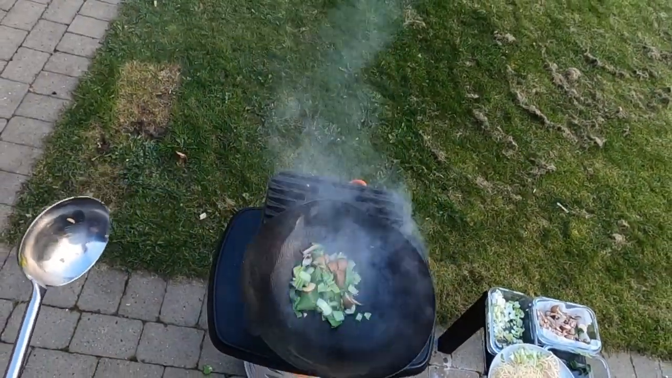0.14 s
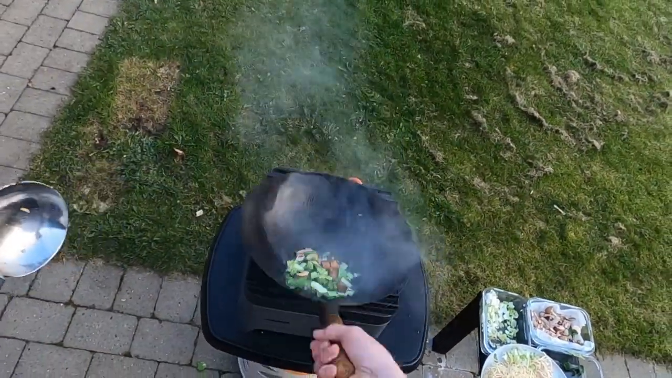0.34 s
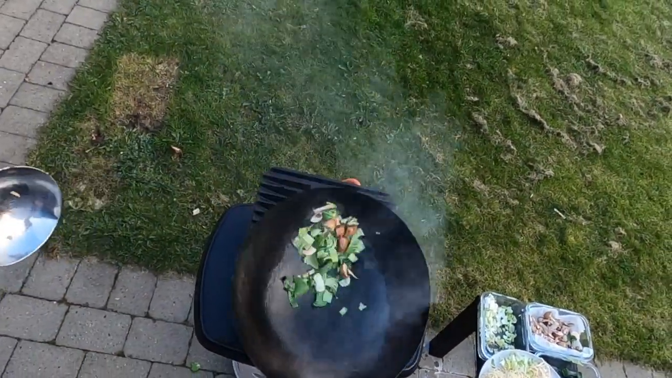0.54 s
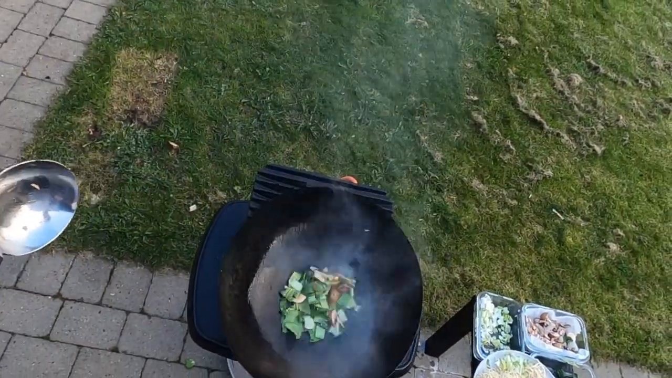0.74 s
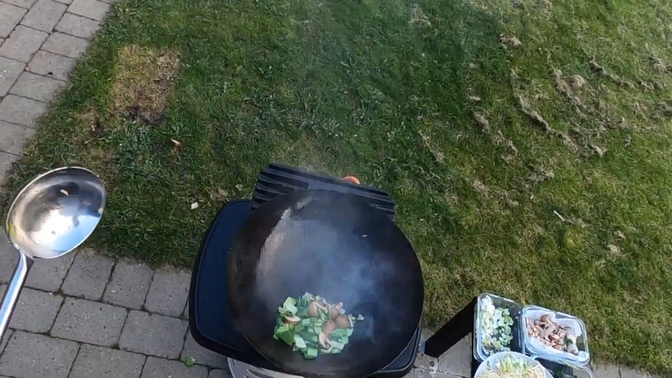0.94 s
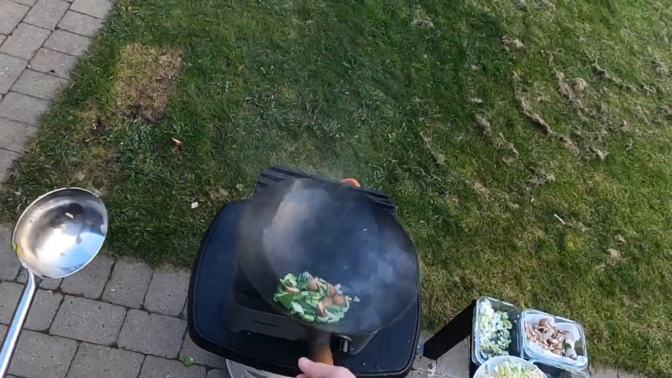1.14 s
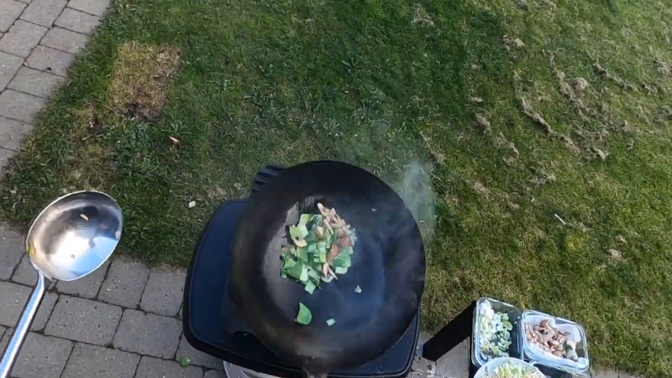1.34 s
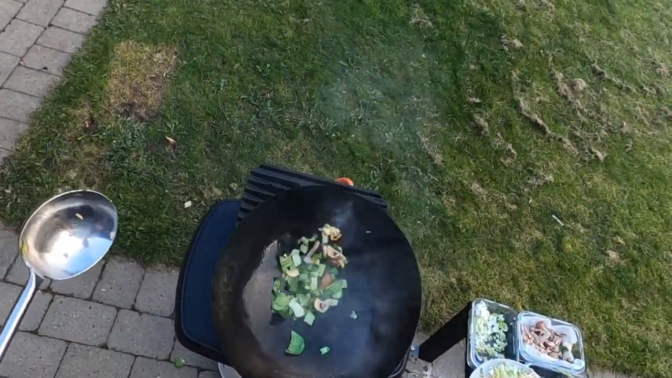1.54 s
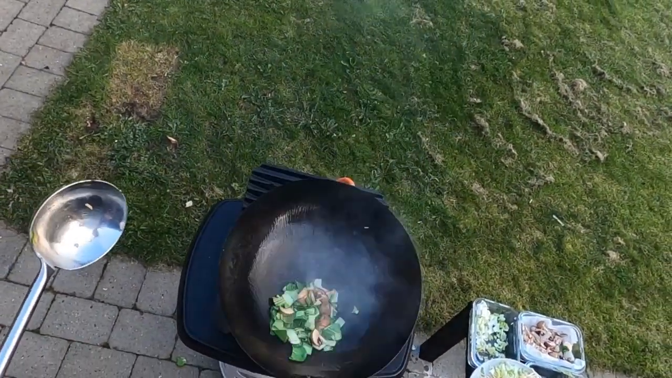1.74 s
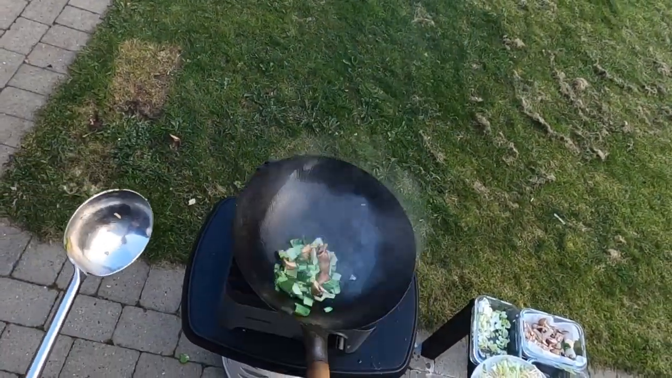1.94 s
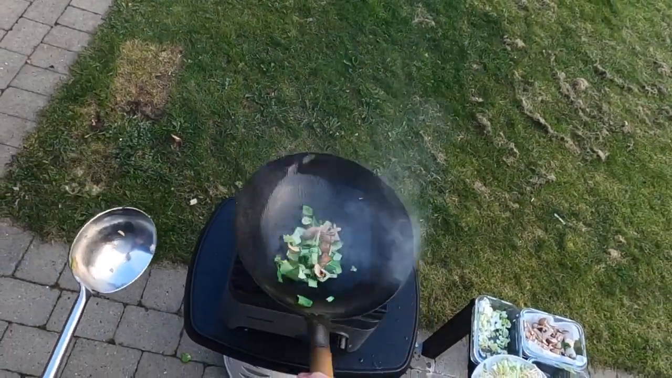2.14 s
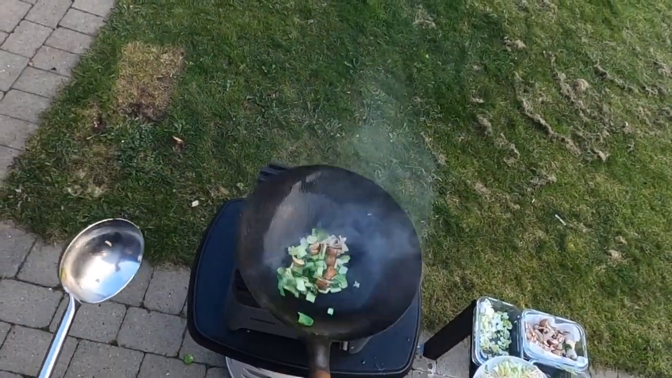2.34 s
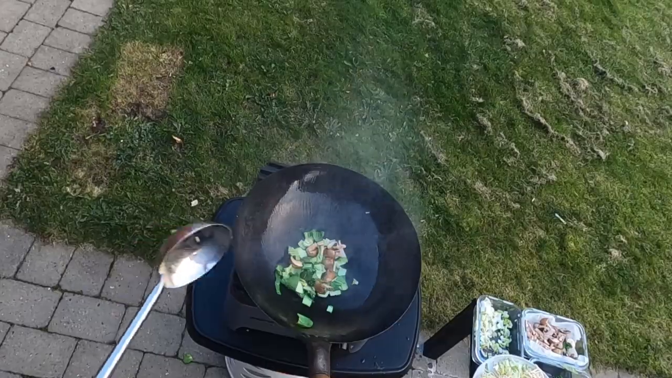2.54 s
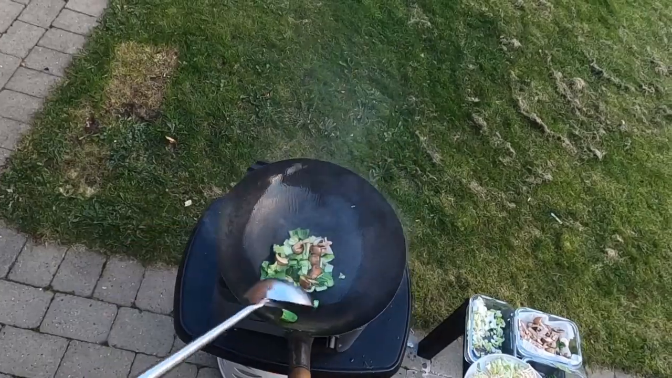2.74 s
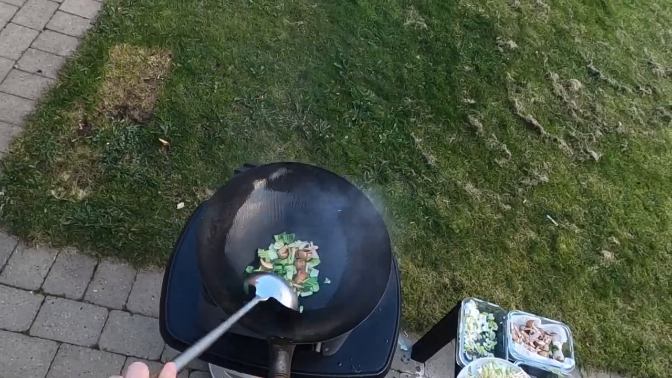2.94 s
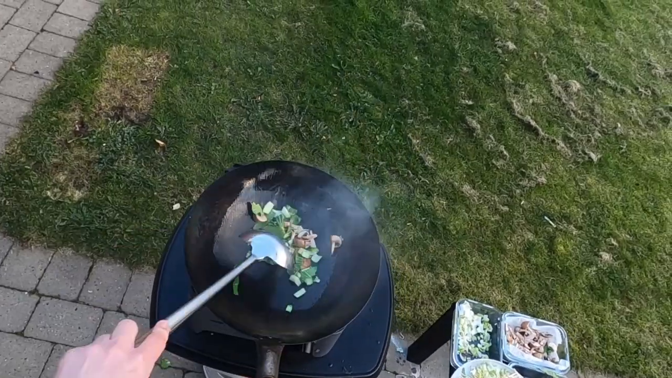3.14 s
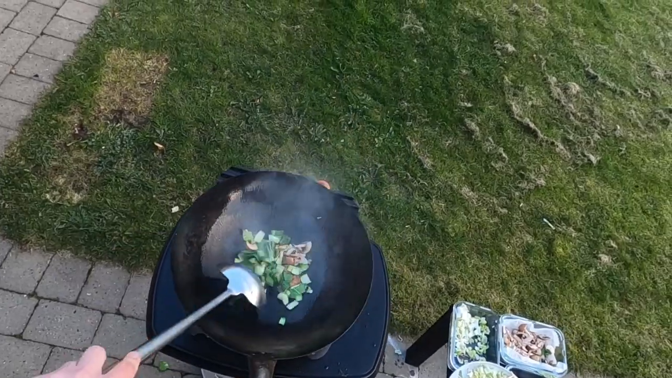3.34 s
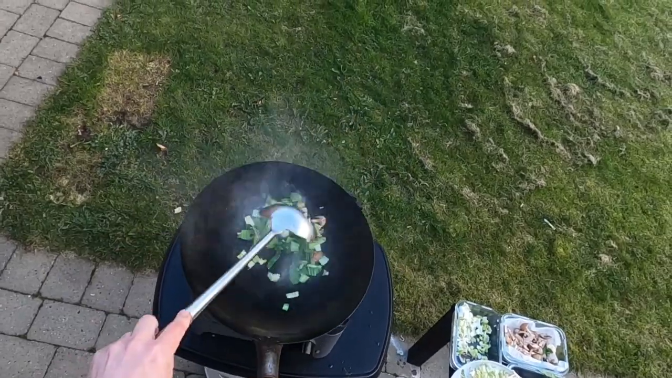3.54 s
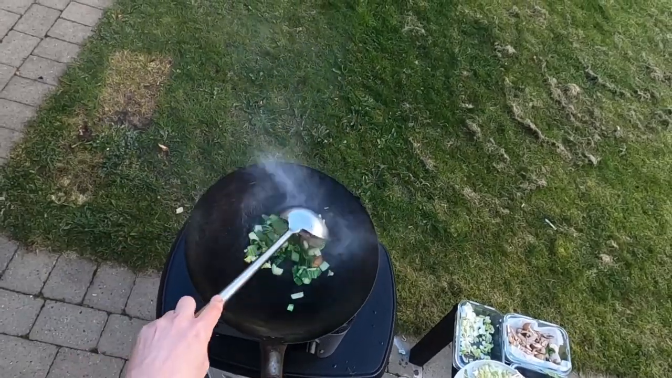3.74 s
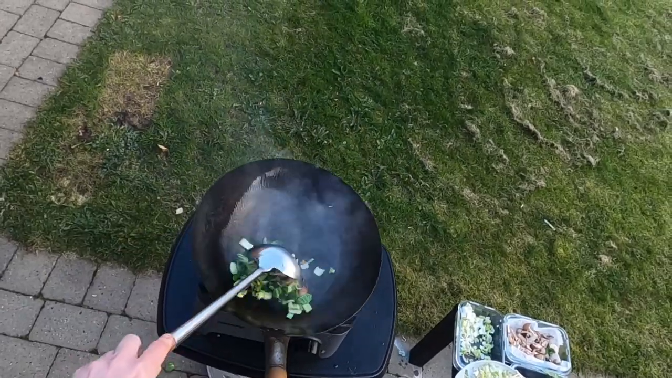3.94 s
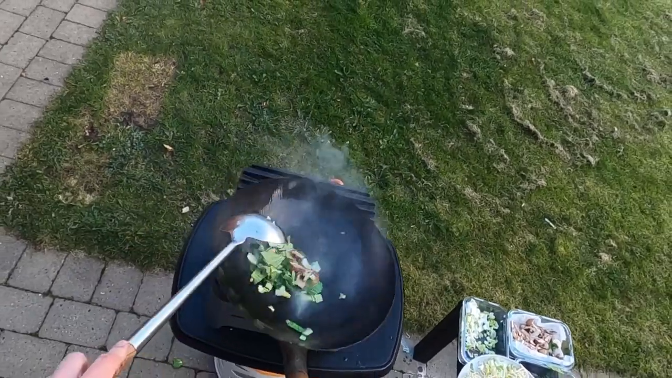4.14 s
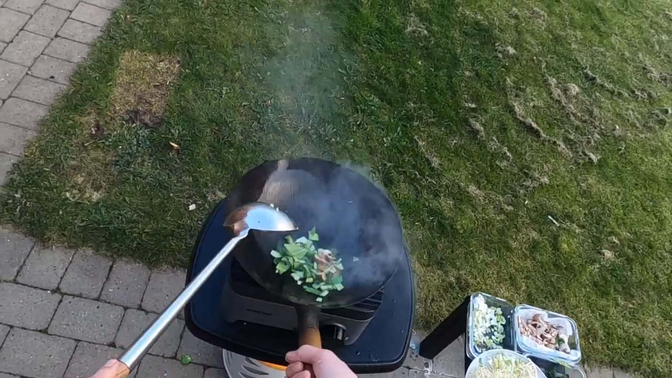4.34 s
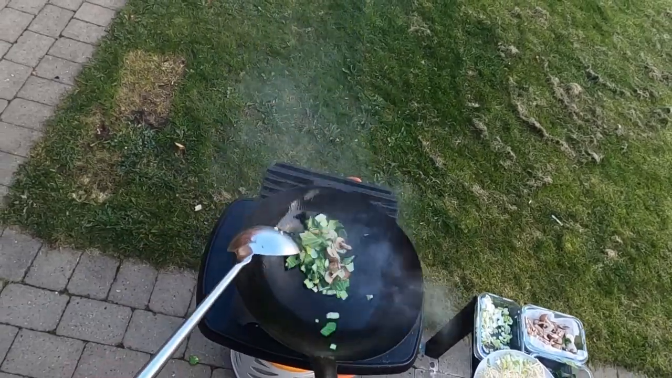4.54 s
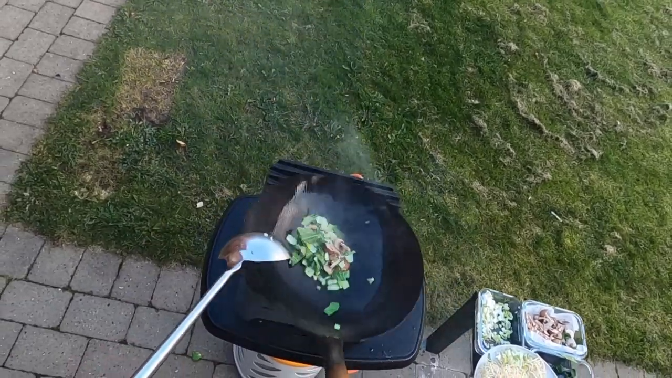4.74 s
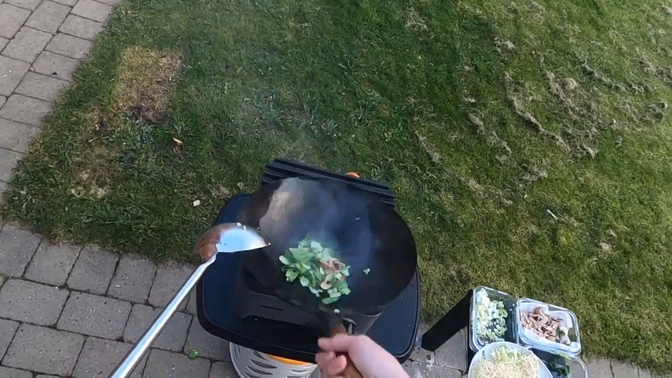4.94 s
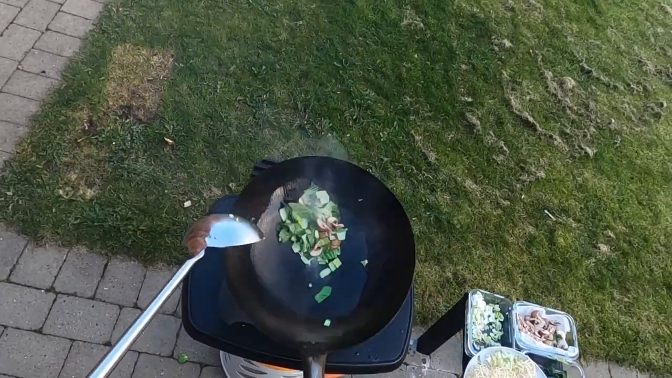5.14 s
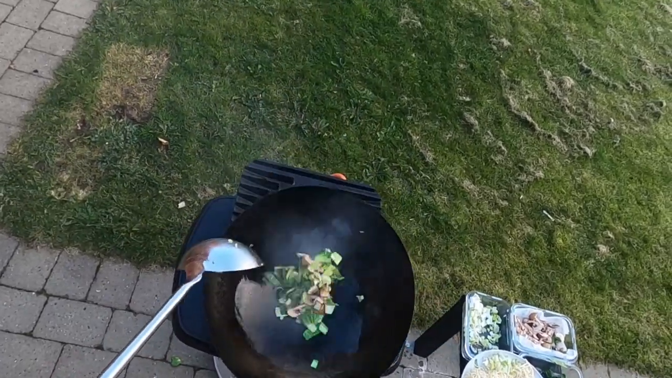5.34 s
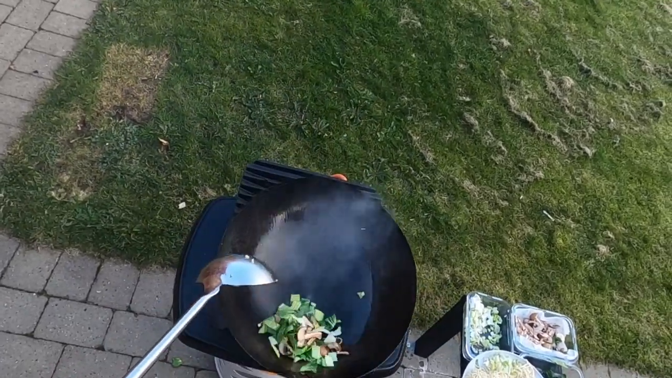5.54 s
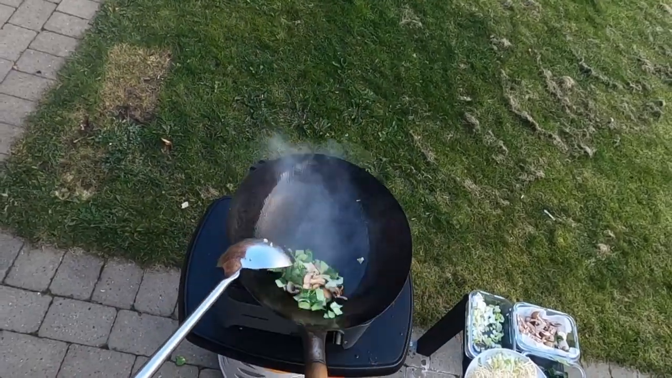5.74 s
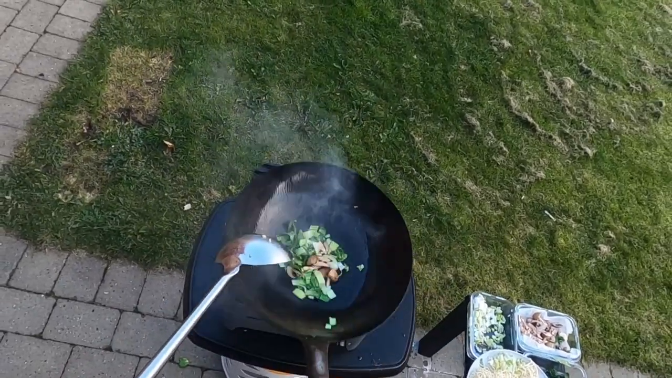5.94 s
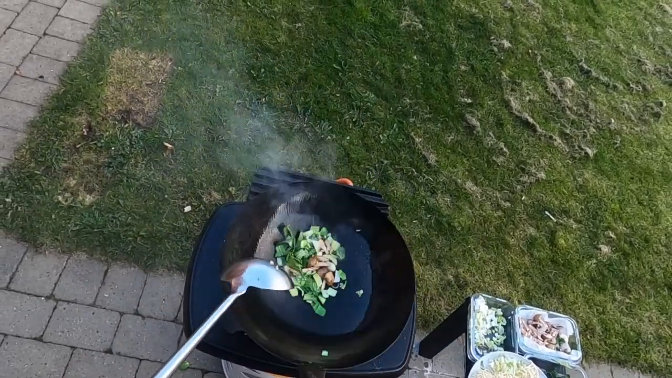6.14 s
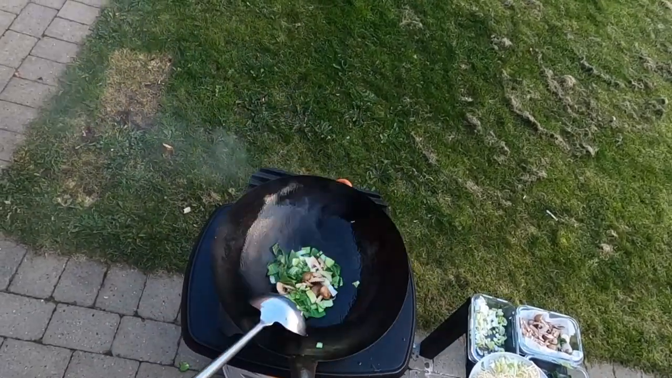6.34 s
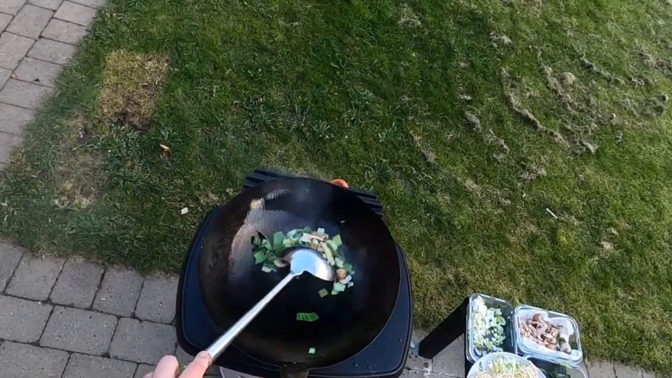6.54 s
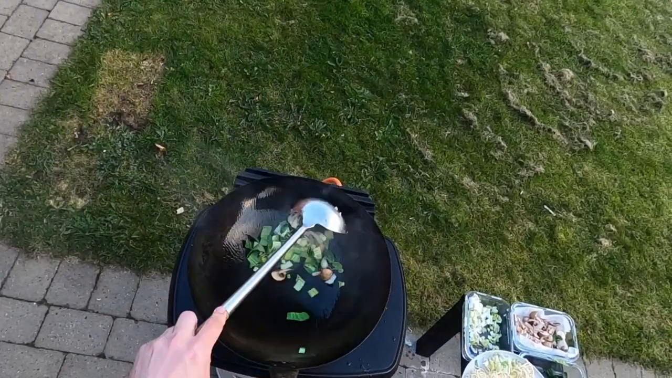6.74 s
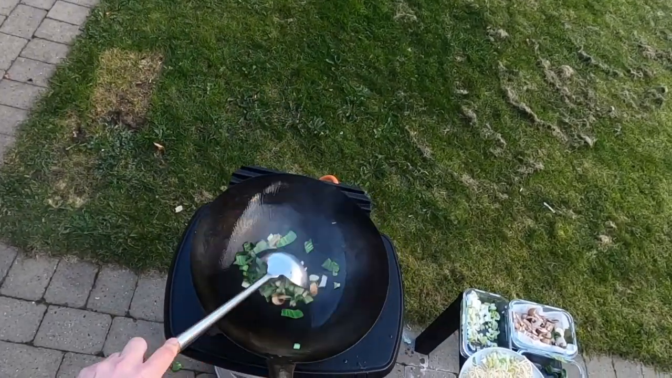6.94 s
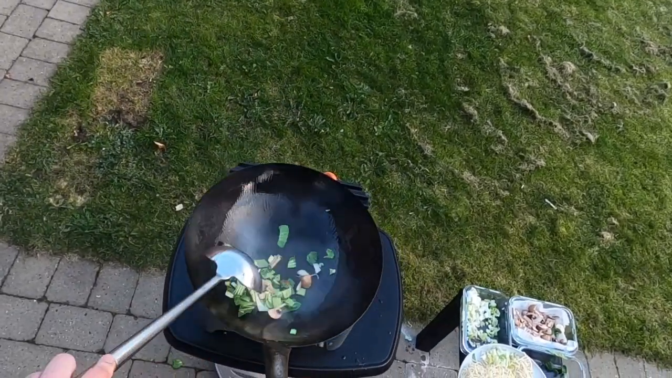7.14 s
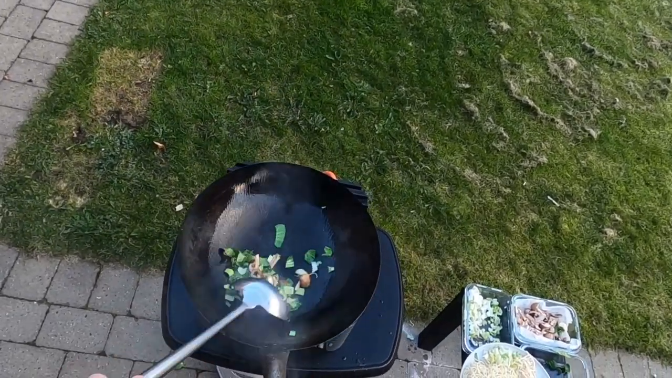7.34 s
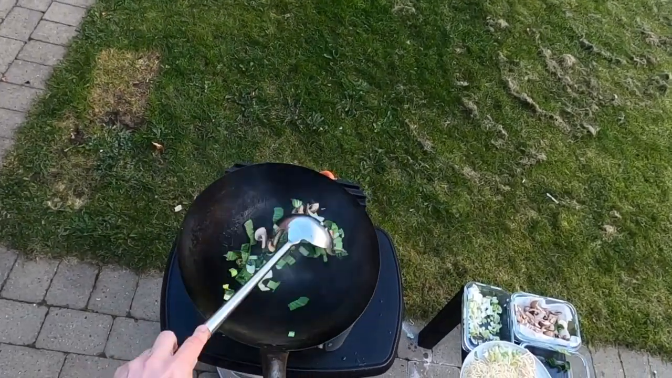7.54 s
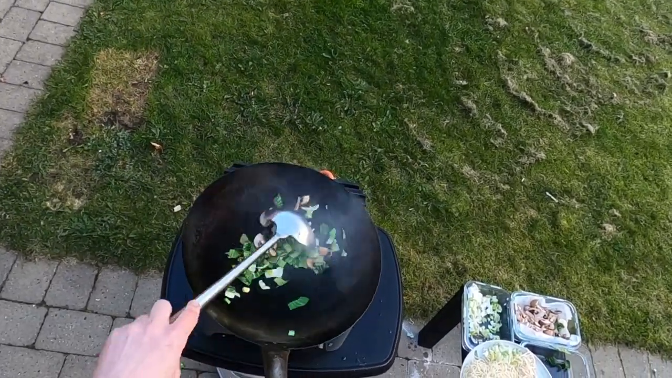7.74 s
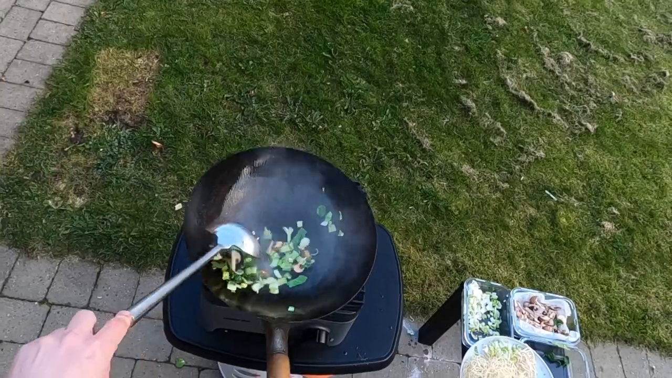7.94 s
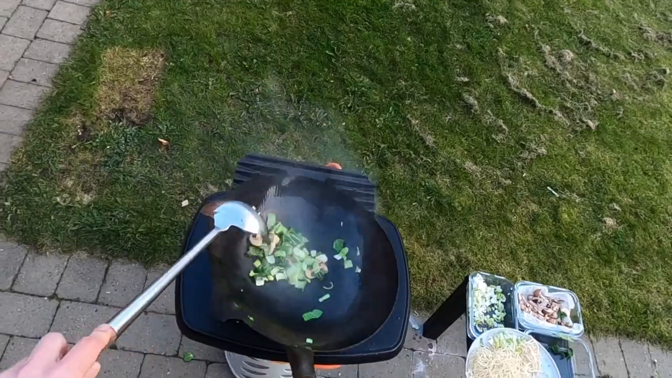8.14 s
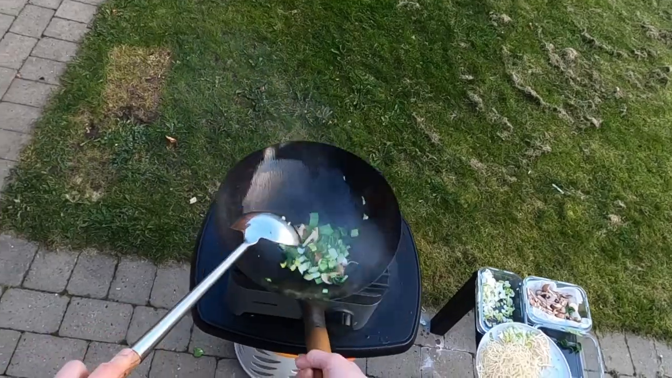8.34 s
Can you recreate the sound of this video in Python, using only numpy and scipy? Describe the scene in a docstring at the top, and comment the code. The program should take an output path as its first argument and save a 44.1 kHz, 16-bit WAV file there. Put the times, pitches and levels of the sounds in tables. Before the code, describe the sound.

Steady sizzling in a wok over a gas flame, broken by thumps as the pan is tossed, then ringing metal ladle strikes and scrapes.

```python
"""Food hisses and crackles in a steel wok over a gas flame, with spits of fat, thuds, scrapes and gusts of wind.
Frying is patchy noise and tiny bursts; a spit is a few dying sine tones. Low thuds (some perhaps buffets of wind)
and strikes of the ladle are short low swings followed by ringing steel; scrapes and skids are gritty noise through
the same resonances. Dragging and flame are low bumpy noise; wind is deep noise that differs between two ports."""
import sys
import numpy as np
from scipy import signal
from scipy.fft import rfft, irfft, next_fast_len
from scipy.io import wavfile
from scipy.ndimage import uniform_filter1d, map_coordinates

SR = 44100
rng = np.random.default_rng(int(sys.argv[2]) if len(sys.argv) > 2 else 0)


def materialize(psi):
    """Save the field psi as 16-bit PCM at rate SR to the path in sys.argv[1].

    A 1-D psi becomes a single channel; in a 2-D psi each row is a channel.
    """
    bounded = np.clip(np.atleast_2d(psi).T, -1, 1)
    quanta = np.round(bounded * 32767).astype(np.int16)
    wavfile.write(sys.argv[1], SR, quanta)


def gain_from_decibels(decibels):
    """Convert decibel values to linear amplitude factors."""
    exponent = np.asarray(decibels, float) / 20
    return 10 ** exponent


N = 369999  # length [samples]

# resonances of the wok bowl: (frequency [Hz], width [Hz], level [dB])
WOK_MODES = [(124.5, 10.3, 1), (248, 8.2, -12), (378, 37, 16.5), (540, 42, 4), (645, 22, 4),
             (716, 9.8, -3.5), (896, 103, 0), (1023, 32, -2), (1093, 51, 3), (1276, 33, -3),
             (1473, 55, -3.5), (1920, 49, 6), (2270, 92, 10), (2580, 83, 1)]
# resonances of the ladle: (frequency [Hz], width [Hz], level [dB])
LADLE_MODES = [(3636, 103, -2.5), (3858, 33, 4.5), (3980, 29, 0.5), (4130, 43, 0.5), (4334, 19, 0),
               (4360, 15, 0.5), (4556, 110, 1), (4870, 29, 3), (5060, 100, -8), (5560, 51, 0),
               (6200, 240, -11)]


def unit(x):
    """Scales to an average strength (rms) of 1."""
    return x / np.sqrt(np.mean(x ** 2) + 1e-20)


def along(points, hz):
    """Reads a curve of (frequency [Hz], value) points on a log frequency axis."""
    f, v = np.transpose(points)
    return np.interp(np.log(hz + 1), np.log(f + 1), v)


def curves(rows):
    """Draws straight lines through a table: one value per sample for each column after the time."""
    s, *columns = np.transpose(rows)
    return [np.interp(np.arange(N) / SR, s, column) for column in columns]


def wobble(rate):
    """A smooth random curve through `rate` random points a second."""
    points = rng.standard_normal(int(N * rate / SR) + 4)
    return map_coordinates(points, [np.arange(N) * rate / SR])


def filtered(x, response):
    """Multiplies the spectrum of x by a (possibly complex) response of frequency."""
    m = next_fast_len(N + SR // 2)
    return irfft(rfft(x, m) * response(np.fft.rfftfreq(m, 1 / SR)), m)[..., :N]


def modes(table):
    """The response of resonances that ring on after a push; neighbours have opposite signs."""
    def response(f):
        total = 0
        for k, (centre, width, db) in enumerate(table):
            total = total + (-1) ** k * gain_from_decibels(db) * 1j * f * width / (centre * centre - f * f + 1j * f * width)
        return total
    return response


def grains(rate, spread_db):
    """Noise of rms 1 made of short bursts of unequal size, about `rate` a second."""
    sizes = (rng.random(N) < rate / SR) * gain_from_decibels(spread_db * np.minimum(rng.exponential(1, N), 3))
    bursts = signal.fftconvolve(sizes, np.exp(-np.arange(40) / 6))[:N]
    return unit(bursts * rng.standard_normal(N))


def spread(x, spectrum):
    """Colours x by a spectrum and scales it to rms 1."""
    return unit(filtered(x, lambda hz: gain_from_decibels(along(spectrum, hz))))


def patchy(depth_db):
    """Noise with patches of random gain in time and frequency."""
    z = signal.stft(rng.standard_normal(N), nperseg=512)[2]
    field = uniform_filter1d(uniform_filter1d(rng.standard_normal(z.shape), 6, 0), 9, 1)
    return signal.istft(z * gain_from_decibels(depth_db * unit(field)), nperseg=512)[1][:N]


def ring(table, t, near_hz, reach_hz):
    """Resonances ring and die freely; those near a favoured frequency are strengthened."""
    hz, width, db = np.transpose(table)[:, :, None]
    strength = gain_from_decibels(db + rng.normal(0, 1.33, hz.shape)) / (1 + ((hz - near_hz) / reach_hz) ** 2)
    return np.sum(strength * np.exp(-np.pi * width * t) * np.sin(2 * np.pi * hz * t), axis=0)


def frying():
    """Countless steam bubbles burst in the oil: a dense hiss with larger crackles standing out."""
    # level of the hiss as it swells and dips: (time [s], level [dB])
    hiss = [(0.0, -34.5), (0.23, -38), (0.47, -37.5), (0.55, -44), (0.67, -29), (0.84, -37.5), (0.89, -33),
            (1.1, -32.5), (1.38, -37.5), (1.54, -27.5), (1.59, -42.5), (1.75, -36.5), (1.87, -30.5),
            (2.05, -38), (2.17, -32.5), (2.27, -40), (2.43, -35), (2.5, -40), (2.62, -34), (2.92, -39),
            (3.08, -32.5), (3.15, -33), (3.39, -38.5), (3.47, -35), (3.52, -37.5), (3.72, -35.5),
            (3.99, -43.5), (4.09, -36.5), (4.23, -46), (4.32, -37.5), (4.55, -36.5), (4.62, -30.5),
            (4.79, -36), (4.95, -32.5), (5.07, -35.5), (5.51, -36), (5.65, -34), (5.89, -40.5), (6.0, -31),
            (6.14, -37.5), (6.29, -32.5), (6.36, -38.5), (6.45, -34), (6.56, -35), (7.08, -33.5),
            (7.22, -35.5), (7.41, -35.5), (7.52, -40), (7.59, -31), (7.71, -34), (8.01, -36), (8.06, -31.5),
            (8.27, -31), (8.39, -32.5)]
    # changes in the brightness of the hiss as heard:
    # (time [s], body level [dB re fizz], top level [dB re fizz])
    brightness = [(0, 0.5, -11), (1.4, -3, -16.5), (1.9, 0.5, -20), (2.4, 2.5, -7.5), (3.0, -1, -19),
                  (3.3, -0.5, -5), (3.47, -0.5, -5), (3.51, -6, -15), (3.6, 2.5, -4.5), (4.3, 3, -3.5),
                  (4.7, -2.5, -6.5), (5.8, 1, -4.5), (6.2, -3, -7.5), (7.0, -0.5, -9), (7.6, -2, -10.5),
                  (8.39, -3.5, -13)]
    # spectrum of the middle body of the hiss: (frequency [Hz], density [dB per Hz])
    body = [(440, -22), (750, -16), (947, -17), (1030, -13.5), (1970, -1.5), (3200, -3), (3720, 1),
            (4980, -4), (5500, -4.5), (7150, -23), (12100, -120)]
    # spectrum of the bright fizz: (frequency [Hz], density [dB per Hz])
    fizz = [(2940, -15.5), (5000, -3.5), (5320, -4.5), (6510, 1), (8400, 5), (9390, -6), (10500, -10.5),
            (13600, -25), (22000, -120)]
    # spectrum of the highest hiss: (frequency [Hz], density [dB per Hz])
    top = [(5880, -17.5), (10000, -8), (13900, -7), (15100, -5), (15900, -25)]
    body_db, top_db = curves(brightness)
    steam = patchy(depth_db=2.0) + 0.77 * grains(rate=900, spread_db=2.6)
    level = gain_from_decibels(curves(hiss)[0] + 1.44 * wobble(25))
    layers = spread(steam, fizz)
    layers = layers + gain_from_decibels(body_db + 1.5) * spread(steam, body)
    layers = layers + gain_from_decibels(top_db) * spread(steam, top)
    return level * layers


def wind():
    """Wind lumps differ from port to port; the stronger the gust, the brighter."""
    # strength of the wind on the ports: (time [s], level [dB])
    gusts = [(0, -39), (0.11, -38), (0.42, -30), (0.54, -42), (0.75, -31), (0.93, -71), (1.19, -33),
             (1.29, -35), (1.38, -43), (1.46, -26), (1.63, -21), (1.82, -20.5), (1.89, -36), (2.12, -29),
             (2.22, -42), (2.5, -32), (2.73, -48), (3.04, -49), (3.3, -39), (3.55, -40), (3.64, -29),
             (3.72, -41), (4.23, -54), (4.7, -49), (5.09, -55), (5.35, -45), (5.6, -50), (7.24, -54),
             (7.45, -34.5), (7.71, -37), (8.01, -52), (8.39, -58.5)]
    # spectrum of the deep buffeting: (frequency [Hz], density [dB per Hz])
    buffet = [(12, -32), (20, 7.5), (38, 12.5), (145, 4.5), (247, -7), (416, -18.5), (483, -14), (700, -26),
              (910, -58), (1540, -120)]
    # spectrum of the brighter edge of a gust: (frequency [Hz], density [dB per Hz])
    gust_edge = [(60, -21), (150, 0.5), (300, -3), (600, -17.5), (900, -27), (1500, -120)]
    gust_db = curves(gusts)[0]
    lumps = gain_from_decibels(5.5 * np.array([wobble(19), wobble(17)]) + [[-1.2], [1.2]])
    deep = spread(rng.standard_normal((2, N)), buffet)
    edge_db = -6 + 0.69 * (gust_db + 23.5) + np.array([[2.5], [-2.5]])  # grows with the gust
    edge = gain_from_decibels(edge_db) * spread(rng.standard_normal((2, N)), gust_edge)
    return gain_from_decibels(gust_db + 3) * unit(lumps) * (deep + edge)


def low_end():
    """The flame roars softly and the sliding wok bumps over the bars of the grate."""
    # the wok dragged and rocked over the grate: (time [s], level [dB])
    drag = [(0.0, -39.5), (0.56, -52), (0.72, -44), (0.91, -49.5), (1.12, -43.5), (1.26, -41.5),
            (1.45, -34.5), (1.56, -27.5), (1.66, -34), (1.8, -45), (2.08, -44.5), (2.43, -40), (2.71, -47),
            (3.86, -46.5), (4.25, -43.5), (4.7, -33.5), (5.0, -38), (5.37, -42), (5.56, -46), (5.86, -42.5),
            (6.0, -39.5), (6.36, -37), (6.54, -37.5), (6.68, -38), (6.78, -51), (7.43, -51.5), (7.57, -43),
            (7.92, -52), (8.13, -52), (8.39, -33)]
    # spectrum of the rumble: (frequency [Hz], density [dB per Hz])
    rumble = [(65, -23), (110, -5), (226, 3.5), (283, -3), (329, -2), (603, -10.5), (672, -9.5), (800, -26),
              (1040, -51), (1760, -120)]
    bumps = grains(rate=83, spread_db=4.0)
    level = gain_from_decibels(curves(drag)[0] + 2.5) * gain_from_decibels(3.1 * wobble(30))
    return level * spread(patchy(depth_db=3.5) + 0.57 * bumps, rumble)


def spits():
    """A drop of water bursts in the fat: a sharp tick with a duller pop under it."""
    # single spits of fat: (time [s], level [dB], pop level [dB re tick])
    drops = [(0.2087, -22, -14.5), (0.334, -11, -16), (0.339, -1, -12), (0.788, -7, 2), (1.0043, -7, -22),
             (1.3517, -10, -22), (1.4173, -5, -17), (1.547, -9.5, 16.5), (2.425, -2.5, -7),
             (2.68, -14, -24), (2.8239, -8.5, -28), (2.9645, -23, -2), (3.4277, -10, -25), (3.455, -20, -6),
             (4.1294, -8, -23), (4.466, -15, -8), (5.1934, -32, -15), (5.939, -17, -17), (6.18, -16, -17),
             (6.7875, -31, -15), (7.3894, -5, -17), (7.568, -8, -3), (7.826, -7.5, -16)]
    out, t = np.zeros(N + SR), np.arange(200) / SR
    for s, db, low_db in drops:
        tones = np.sin(2 * np.pi * 8000 * t) + 1.05 * np.sin(2 * np.pi * 5000 * t)
        tick = gain_from_decibels(-60 * t / 0.0034) * tones
        pop = gain_from_decibels(low_db + 5.5 - 60 * t / 0.0018) * np.sin(2 * np.pi * 2100 * t)
        start = round((s + 0.0011) * SR)  # just over a millisecond after the listed time
        out[start:][:len(t)] -= gain_from_decibels(db - 9.5) * (tick + pop)
    return out[:N]


def thuds_and_strikes():
    """Each sound: a short dull thud, small rebounds and a low boom, then a crack and the upper ring."""
    # low thuds, some of them perhaps buffets of wind: (time [s], thud level [dB], thud pitch [Hz])
    thud_rows = [(0.557, -20.5, 340), (0.589, -14.5, 370), (0.599, -14, 357), (0.733, -8.5, 338),
                 (0.749, -12.5, 235), (0.763, -10, 357), (1.136, -13.5, 146), (1.385, -18.5, 169),
                 (1.46, -18, 140), (1.559, -13, 196), (1.618, -11.5, 205), (1.712, -23.5, 148),
                 (1.75, -17.5, 250), (1.82, -21, 200), (1.96, -12.5, 273), (4.481, -22, 307),
                 (4.798, -22, 248), (4.947, -22, 343), (5.199, -13.5, 424), (5.22, -14, 635),
                 (5.332, -6.5, 346), (5.37, -10, 310), (5.407, -6.5, 323), (5.423, -10, 360),
                 (5.432, -7, 304), (5.531, -22.5, 540), (5.779, -8.5, 250), (6.01, -25, 307),
                 (8.344, -31.5, 362)]
    # the ladle strikes the bowl:
    # (time [s], thud level [dB], thud pitch [Hz], favoured wok mode [Hz], wok ring level [dB re thud])
    strike_rows = [(2.997, -20.5, 870, 1340, 10), (3.044, -21, 910, 880, 3), (3.475, -6.5, 384, 1110, -2.5),
                   (3.95, -10, 361, 1860, -6.5), (4.057, -37, 615, 2440, -1), (6.446, -33, 202, 859, -21),
                   (6.519, -13.5, 352, 1080, -3.5), (6.666, -31, 600, 1840, 4),
                   (6.965, -15.5, 354, 1970, -6.5), (7.073, -13.5, 250, 1920, -4),
                   (7.423, -16, 406, 1170, 7), (7.856, -16.5, 378, 1930, -1)]
    out, t = np.zeros(N + SR), np.arange(SR // 5) / SR
    # added at the end: favoured wok mode [Hz], wok ring and ladle-mode ring [dB re thud]
    thuds = [(*row, 900, -22, -14) for row in thud_rows]
    # the thud level is taken off again, so the ladle's ring has the same level setting for all strikes
    strikes = [(*row, -19.5 - row[1]) for row in strike_rows]
    for s, db, hz, ring_hz, wok_db, ladle_db in thuds + strikes:
        at = round(s * SR)
        turns = hz * t
        push = np.sin(2 * np.pi * turns) * np.exp(-((turns - 1.4) / 0.5) ** 2)  # about two swings
        fade_s = np.array([[0.07], [0.008]])  # time to fall by 60 dB
        chatter = rng.standard_normal((2, len(t))) * gain_from_decibels(-60 * t / fade_s)
        dull = signal.butter(2, [0.52 * hz, 1.2 * hz], "band", fs=SR, output="sos")
        rebounds = unit(signal.sosfilt(dull, chatter[0]))
        boom = ring(WOK_MODES, t, 0.59 * hz, reach_hz=140) * (1 - np.exp(-turns / 4.3))
        out[at:][:len(t)] += gain_from_decibels(db + 1.5) * (push + 0.11 * rebounds + 0.23 * boom)

        sharp = signal.butter(1, [900, 4500], "band", fs=SR, output="sos")
        crack = signal.sosfilt(sharp, chatter[1])
        metal = gain_from_decibels(wok_db - 5.5) * (ring(WOK_MODES, t, ring_hz, reach_hz=254) + 2.1 * crack)
        metal = metal + gain_from_decibels(ladle_db - 9.5) * ring(LADLE_MODES, t, near_hz=3880, reach_hz=450)
        out[at + 90:][:len(t)] += gain_from_decibels(db) * metal  # 2 ms after the thud starts
    return out[:N]


def strokes():
    """Skids are loud at once and die; scrapes swell and fade; both end as the ladle leaves the steel."""
    # steel skids on after a blow:
    # (start [s], length [s], ladle ring level [dB], wok ring level [dB], favoured wok mode [Hz])
    skids = [(0.582, 0.16, -32, -30.5, 550), (0.744, 0.14, -30, -27, 600), (2.993, 0.1, -25, -14, 1247),
             (3.046, 0.064, -32, -20, 940), (3.087, 0.077, -37, -32, 620), (3.476, 0.18, -28, -33, 540),
             (3.941, 0.14, -32, -32, 565), (5.207, 0.054, -36, -23, 900), (5.333, 0.22, -28, -27.5, 550),
             (6.435, 0.12, -30, -28.5, 900), (6.512, 0.076, -22, -18, 1040),
             (6.959, 0.071, -23.5, -27, 680), (7.062, 0.085, -20.5, -26.5, 695),
             (7.415, 0.085, -17, -23.5, 1080), (7.861, 0.04, -29, -26.5, 645)]
    # the ladle is pushed across the bowl:
    # (start [s], length [s], ladle ring level [dB], wok ring level [dB], favoured wok mode [Hz])
    scrapes = [(3.102, 0.064, -17.5, -32.5, 660), (3.163, 0.088, -21.5, -37, 403),
               (3.528, 0.14, -25.5, -41.5, 700), (3.98, 0.13, -21.5, -31.5, 660),
               (5.214, 0.086, -46, -26, 710), (5.394, 0.11, -30.5, -27, 640),
               (6.562, 0.075, -24.5, -29.5, 560), (6.634, 0.096, -21.5, -35.5, 644),
               (7.08, 0.11, -19.5, -36.5, 650), (7.543, 0.055, -29, -37.5, 514),
               (7.578, 0.086, -24, -42, 640)]
    lift_s = 0.03
    for is_skid, rows in ((True, skids), (False, scrapes)):
        for s, length, ladle_db, wok_db, hz in rows:
            t = np.arange(round((length + lift_s) * SR)) / SR
            if is_skid:
                peak_s, levels_db = 0.011, [-30, 0, -21.5, -40]
                near_hz = hz * 0.89 ** (t / length)  # the favoured frequency glides down
            else:
                peak_s, levels_db = 0.55 * length, [-15.5, 0, -15.5, -40]
                near_hz = hz + 0 * t
            shape_db = np.interp(t, [0, peak_s, length, length + lift_s], levels_db)
            yield is_skid, s, shape_db, ladle_db, wok_db, near_hz


def scraping():
    """Rough steel catches and slips: gritty grains set ladle and bowl ringing."""
    grit = grains(rate=2200, spread_db=2.0) * gain_from_decibels(1.8 * wobble(60))
    judder = grains(rate=900, spread_db=2.5) * gain_from_decibels(1.8 * wobble(40))
    scraped = unit(filtered(grit, modes(LADLE_MODES)))
    # a skid rings mainly the middle modes of the ladle: 4150 Hz, 250 Hz wide
    skidding = unit(filtered(scraped, modes([(4150, 250, 0)])))
    bowl = np.array([unit(filtered(judder, modes([mode]))) for mode in WOK_MODES])
    hz, _, db = np.transpose(WOK_MODES)[:, :, None]
    out = np.zeros(N)
    for is_skid, s, shape_db, ladle_db, wok_db, near_hz in strokes():
        ladle = skidding if is_skid else scraped
        start = round(s * SR)
        part = slice(start, start + len(shape_db))
        favour = gain_from_decibels(db) / (1 + ((hz - near_hz) / 80) ** 2)  # the contact spot favours some modes
        wok_ring = gain_from_decibels(wok_db - 4.0) * np.sum(favour * bowl[:, part], axis=0)
        out[part] += gain_from_decibels(shape_db) * (gain_from_decibels(ladle_db) * ladle[part] + wok_ring)
    return out


def scene():
    """All sources in front of two ports: their difference is partly a phase lag, partly diffuse."""
    # left-right difference of the two ports: (frequency [Hz], level [dB re sum], phase [rad])
    ports = [(300, -22.5, -2.5), (900, -9, -2), (1420, -12.5, -1.7), (2500, -7.5, -1.4), (5000, -6.5, -1.7),
             (6800, -0.5, -2.5), (7600, -2.5, -16), (8300, -13, -3), (9600, -5, -2), (11000, -3, -1.3),
             (13000, 2, -3), (16000, -10, -1.5)]
    mid = frying() + low_end() + spits() + thuds_and_strikes() + scraping()
    hz, db, phase = np.transpose(ports)
    z = signal.stft(mid, nperseg=256)[2]
    scrambled = z * np.exp(2j * np.pi * rng.random(z.shape))
    diffuse = signal.istft(scrambled, nperseg=256)[1][:N]
    lagged = filtered(mid, lambda f: np.exp(1j * along(np.c_[hz, phase], f)))
    side = filtered(0.76 * lagged + 1.03 * diffuse, lambda f: gain_from_decibels(along(np.c_[hz, db], f)))
    return np.array([mid + side, mid - side]) + wind()


def roll_off(x):
    """The treble ends steeply here."""
    return signal.sosfilt(signal.butter(12, 16350, fs=SR, output="sos"), x)


def record(dry):
    """Gain control ducks after loud sounds, the stereo width and the very top vary, and peaks are rounded off."""
    # the stereo image narrows and widens:
    # (time [s], difference level below the split [dB], difference level above it [dB])
    width = [(0, -1.5, -3), (1.7, 0, 1), (1.85, -7, -22), (2.3, -14.5, -34), (2.6, -25, -24),
             (3.1, -23, -4), (5.6, -22, -5), (6, -13.5, -3.5), (6.6, -9, -3), (7.5, -5, -3),
             (8.39, -4, 0.5)]
    mid, side = (dry[0] + dry[1]) / 2, (dry[0] - dry[1]) / 2

    # loudness over the last 0.12 s; all excess over -20.5 dB is taken off, smoothed over 6.7 ms
    sense, smooth = round(0.12 * SR), round(0.0067 * SR)
    power = np.abs(uniform_filter1d(mid ** 2, sense, origin=(sense - 1) // 2))
    excess_db = np.maximum(10 * np.log10(power + 1e-12) + 20.5, 0)
    cut_db = uniform_filter1d(excess_db, smooth, origin=(smooth - 1) // 2)

    low_db, top_db = curves(width)
    treble = filtered(side, lambda hz: 1 / (1 + (11300 / (hz + 1)) ** 30))  # the split is at 11300 Hz
    side = gain_from_decibels(low_db) * (side - treble) + gain_from_decibels(top_db) * treble
    air = filtered(mid, lambda hz: 1 / (1 + (13800 / (hz + 1)) ** 16))
    mid = mid - air + gain_from_decibels(2.6 * top_db) * air  # the very top dulls as the upper width narrows
    levelled = gain_from_decibels(-cut_db) * np.array([mid + side, mid - side])
    limited = levelled / (1 + np.abs(levelled) ** 4) ** (1 / 4)  # soft ceiling at 1
    return roll_off(limited)


dry = scene()
out = record(dry)
materialize(out)
```